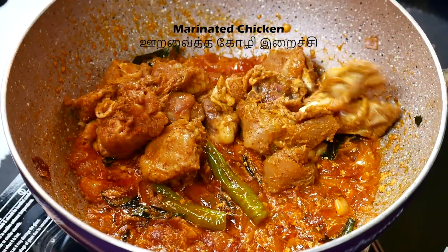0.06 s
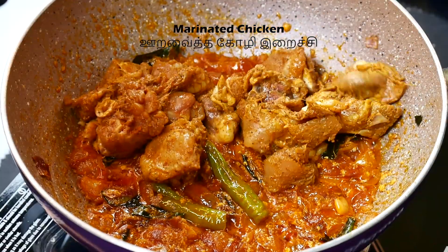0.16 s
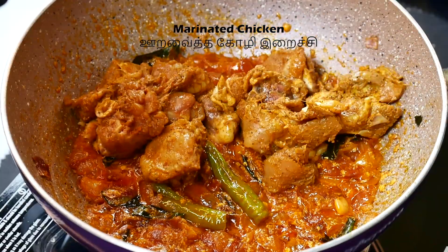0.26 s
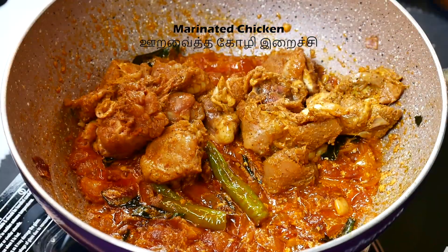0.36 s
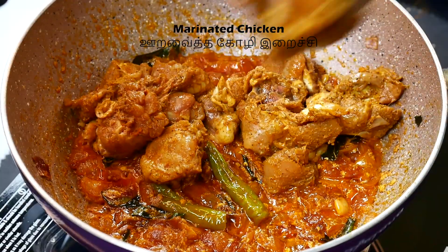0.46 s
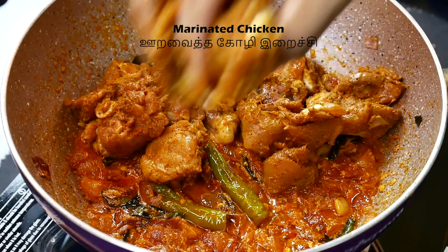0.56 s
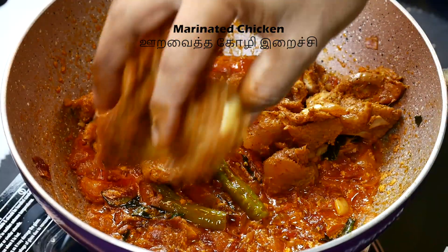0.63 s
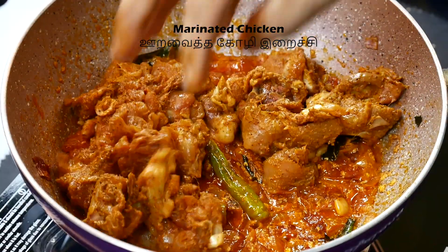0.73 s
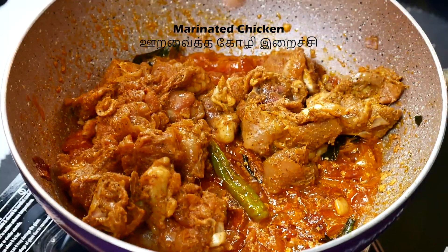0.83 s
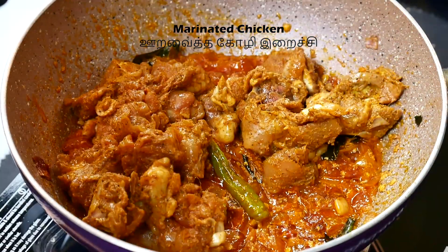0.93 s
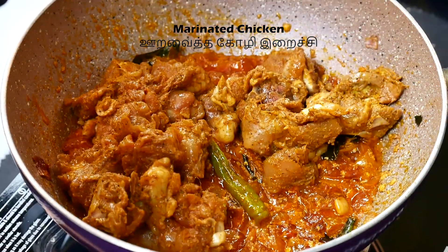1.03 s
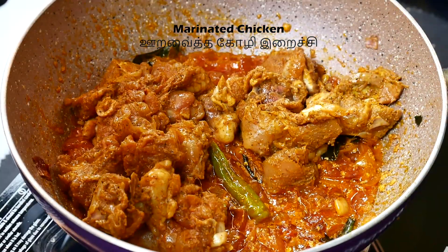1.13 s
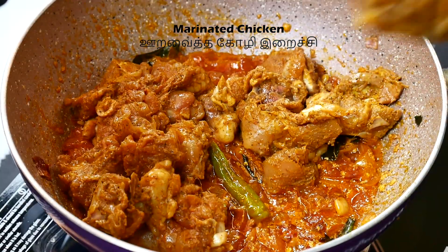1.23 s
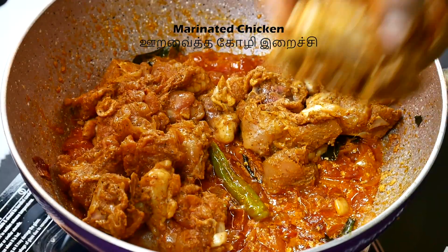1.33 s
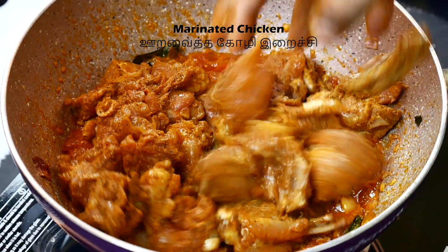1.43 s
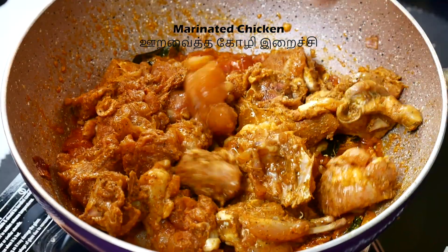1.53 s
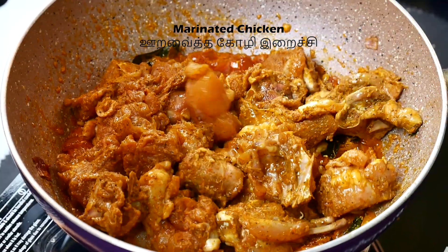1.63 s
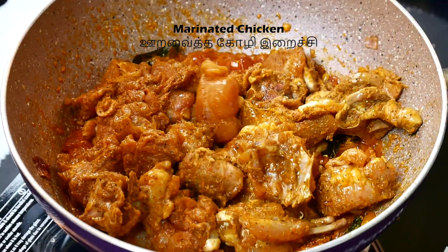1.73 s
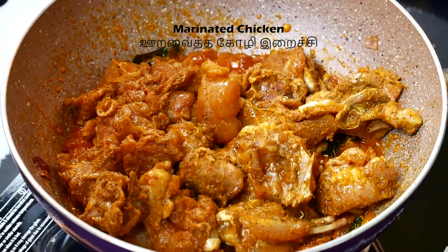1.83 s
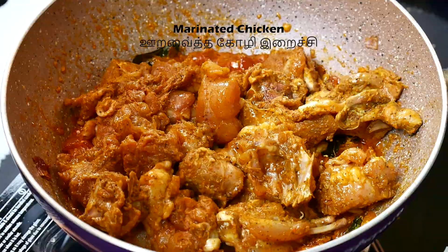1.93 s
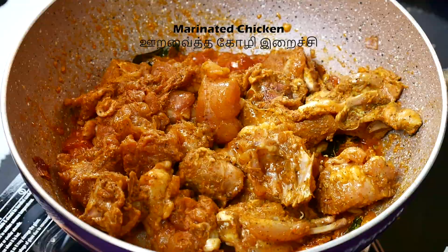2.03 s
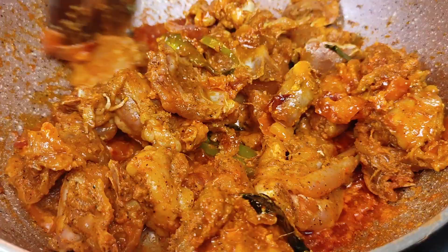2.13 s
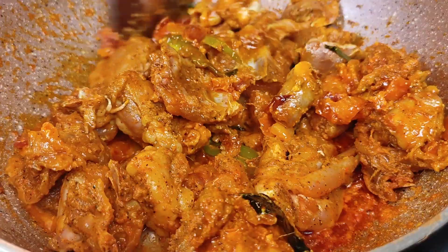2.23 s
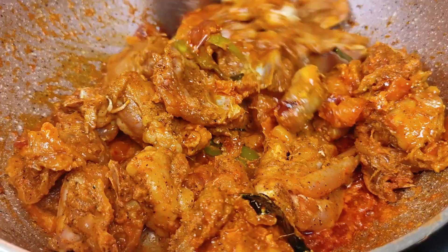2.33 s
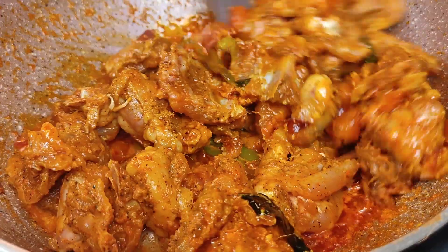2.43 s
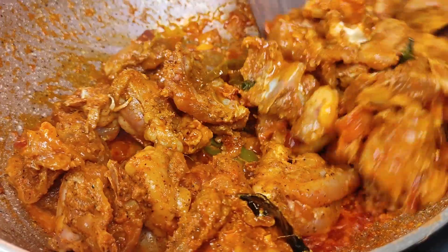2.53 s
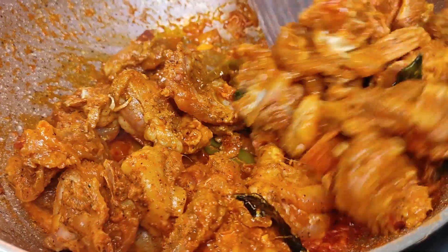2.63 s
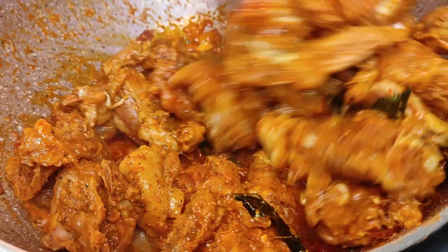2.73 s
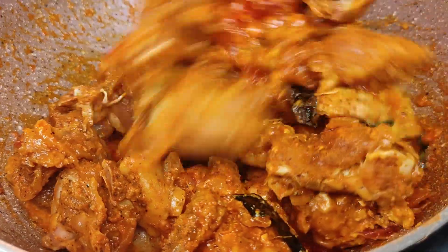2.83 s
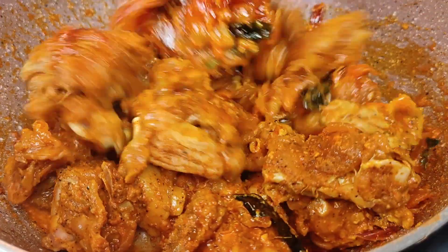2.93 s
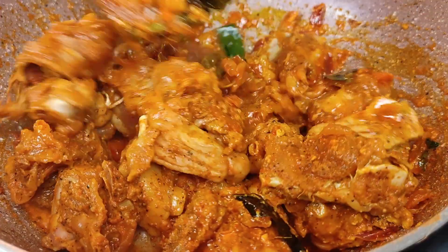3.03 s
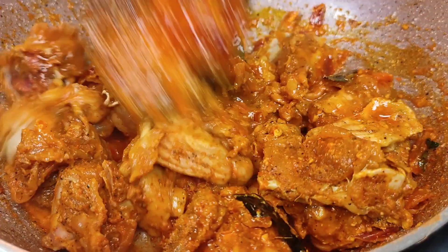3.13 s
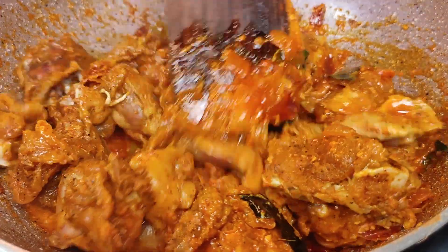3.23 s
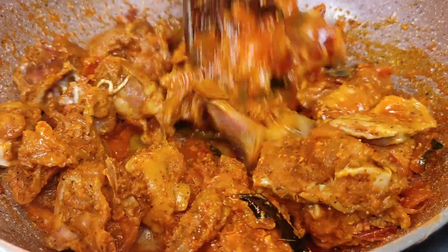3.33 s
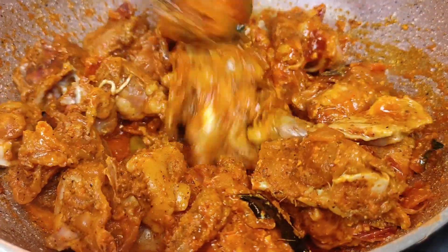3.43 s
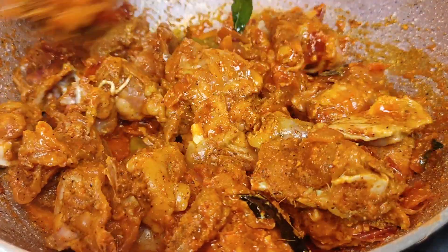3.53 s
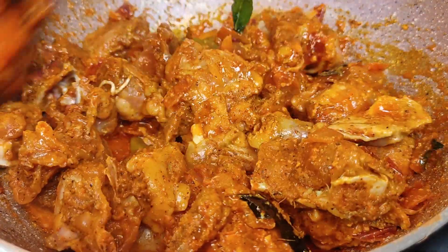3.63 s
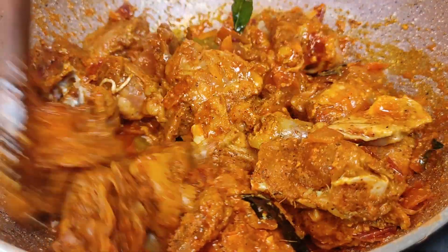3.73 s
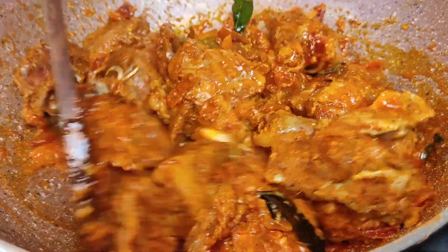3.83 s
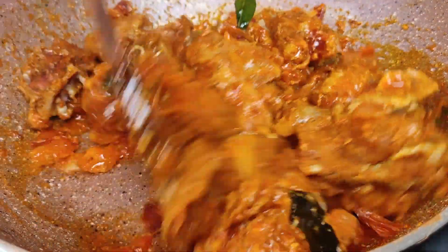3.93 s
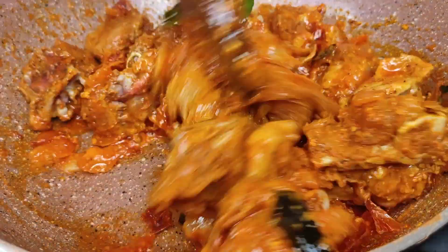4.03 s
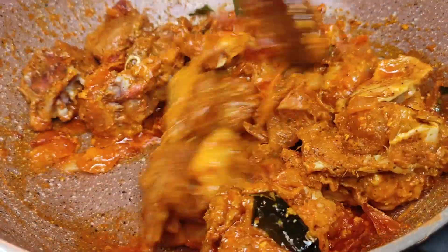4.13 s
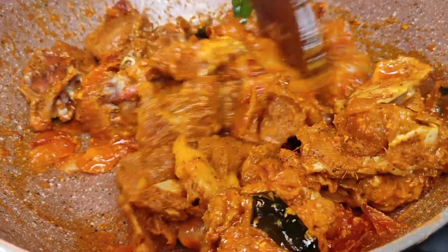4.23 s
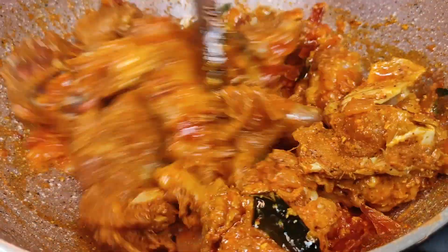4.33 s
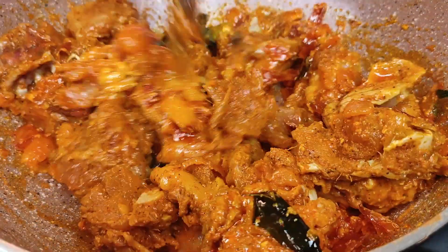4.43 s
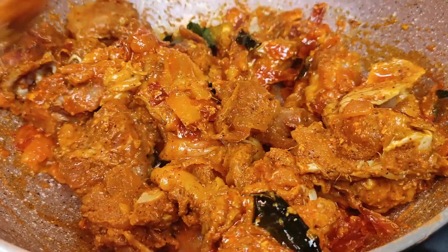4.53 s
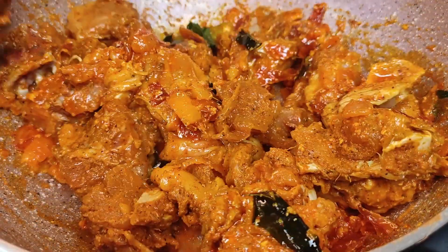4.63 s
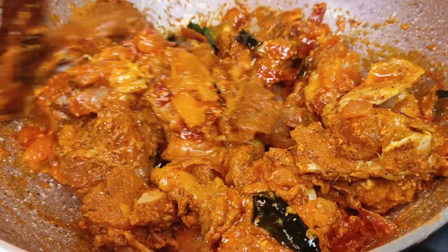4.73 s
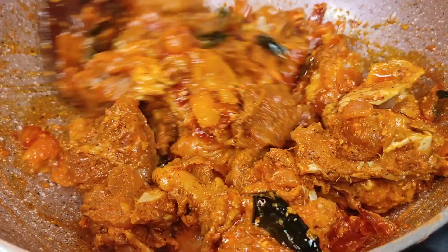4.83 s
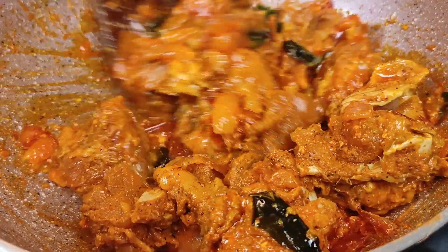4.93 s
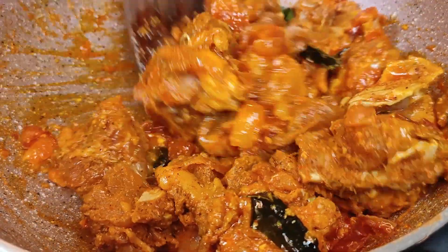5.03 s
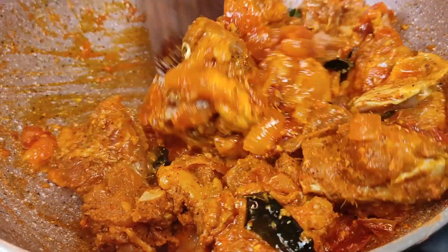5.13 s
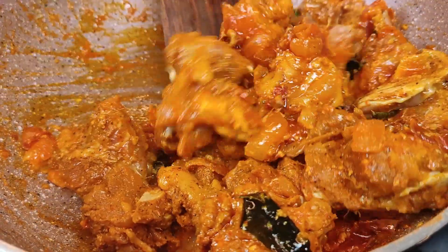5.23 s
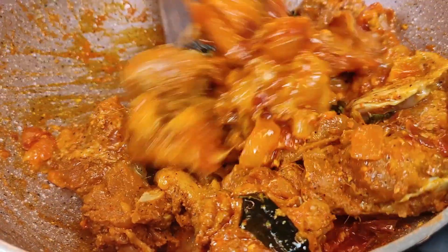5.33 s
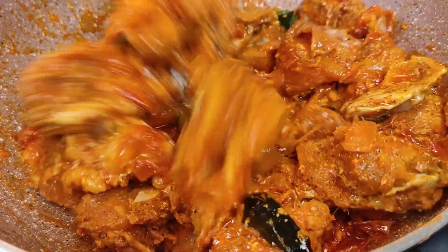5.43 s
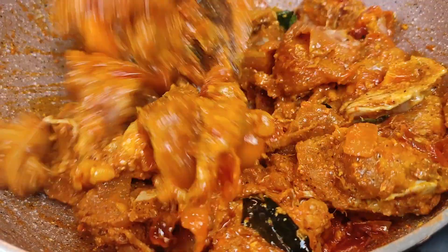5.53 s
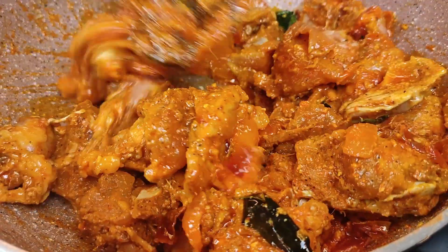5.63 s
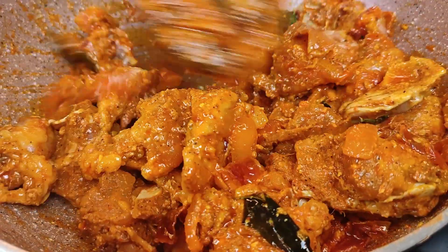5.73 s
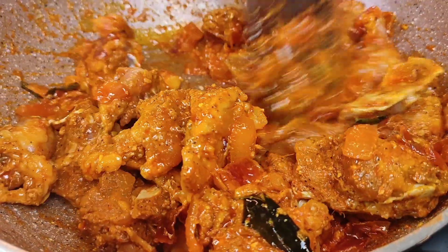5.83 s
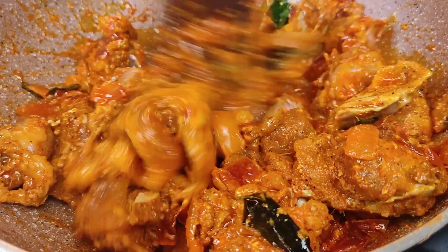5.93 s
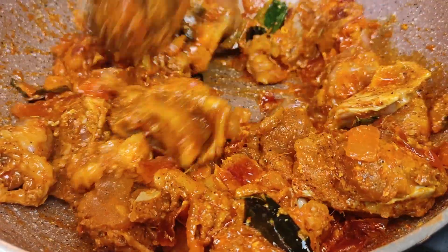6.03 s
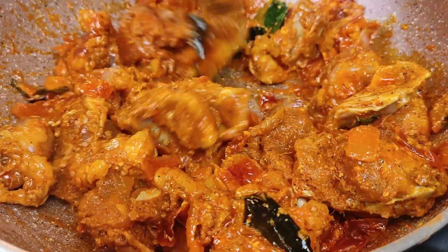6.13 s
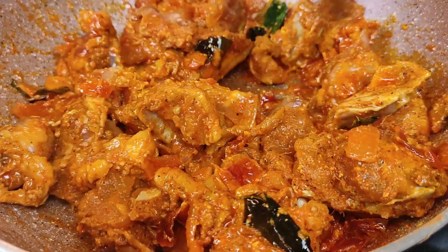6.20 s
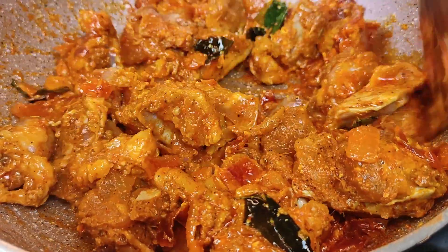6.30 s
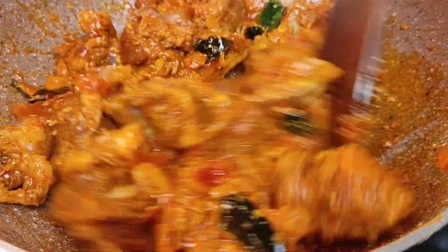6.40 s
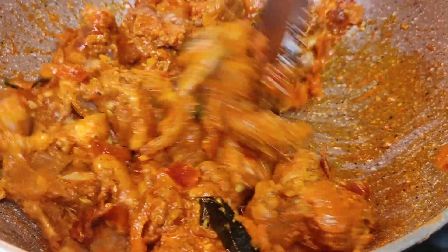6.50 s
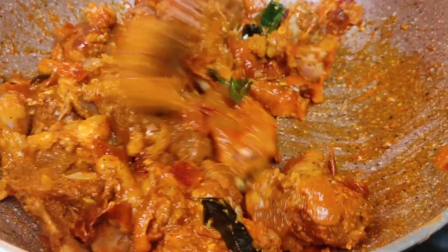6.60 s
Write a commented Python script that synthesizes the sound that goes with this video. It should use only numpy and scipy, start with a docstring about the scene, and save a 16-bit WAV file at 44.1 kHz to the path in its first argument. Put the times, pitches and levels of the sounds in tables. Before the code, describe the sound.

A close, dry-sounding kitchen with faint low room murmur and an even, bubbling simmer in a heavy pan throughout. Almost at once, around 0.05 s, a wet piece of meat slaps down with a strong dull knock and a fading crackle of juice. A sharp spit pops at 0.2 s. More pieces land at 0.75 s with a crisp wet smack and at 1.5 s with a squelch and deep soft thud. The simmer continues alone until a hollow double knock at 2.2 s. From 2.4 s a wooden spatula scrapes the gritty coating in repeated strokes, with taps and bumps near 3.05, 3.5, 4.05 and 5.1 to 5.25 s. The sizzle swells, bright and crackling, with a loud spit at 2.8 s and hissing bursts around 4.4 to 4.7 s. A heavy thump comes at 6.04 s, lighter knocks at 6.2 s, and vigorous frying runs to the end.

```python
"""Sauce simmers in a pan over low room noise; within the first second and a half three pieces of
marinated meat drop in with wet slaps and dull knocks, and fry off their juice. From about 2.4 s a wooden
spatula turns them: it bumps and scrapes the coated pan, and the sizzle swells as wet meat meets hot metal.
Frying is random clicks and ringing bubbles, knocks are decaying modes of pan and hob, slaps are bursts
of wet films; a dense tail adds the small kitchen around one close microphone."""
import sys
import numpy as np
from scipy import signal
from scipy.fft import rfft, irfft
from scipy.io import wavfile

SR = 44100
rng = np.random.default_rng(int(sys.argv[2]) if len(sys.argv) > 2 else 0)


def waveform_to_disk(signal):
    """Save audio, clipped to [-1, 1], as 16-bit WAV at the path in sys.argv[1]."""
    frames = np.transpose(np.atleast_2d(signal))
    scaled = np.clip(frames, -1, 1) * 32767
    samples = np.round(scaled).astype(np.int16)
    wavfile.write(sys.argv[1], SR, samples)


N = 293706
TIME = np.arange(N) / SR  # s


def from_db(db):
    """Decibels to gain."""
    return 10 ** (np.asarray(db) / 20)


def rms_one(x):
    """Scale to rms 1."""
    return x / np.sqrt(np.mean(x ** 2) + 1e-20)


def level(rows):
    """A curve of (s, dB) points as a gain, faded in just before its first point."""
    s, db = np.transpose(rows)
    fade_in = np.clip(1 + (TIME - s[0]) / 0.15, 0, 1)
    return from_db(np.interp(TIME, s, db)) * fade_in


def fading(events, rise_s, fade_s):
    """Each (s, dB) event rises quickly and dies away; their powers add."""
    power = 0
    for s, db in events:
        age = np.maximum(TIME - s, 0)
        shape = (1 - np.exp(-age / rise_s)) * np.exp(-age / fade_s)
        power = power + (from_db(db) * shape) ** 2
    return np.sqrt(power)


def swell(at, db, half_s):
    """A bell-shaped rise and fall in level."""
    return from_db(db) * np.exp(-((TIME - at) / half_s) ** 2)


def drift(rate):
    """Slow chance with spread 1, drawn at every 40th sample."""
    r = np.exp(-80 * np.pi * rate / SR)
    noise = rng.standard_normal(N // 40 + 2002)
    slow = signal.lfilter([1], [1, -2 * r, r * r], noise)[2000:]  # the filter has settled by then
    return np.interp(np.arange(N) / 40, np.arange(len(slow)), rms_one(slow))


def coloured(x, spectrum, size=4096):
    """Causal (minimum-phase) filter of unit energy with the given spectrum."""
    hz, db = np.transpose(spectrum)
    grid = np.maximum(np.fft.rfftfreq(size, 1 / SR), 1)
    skirts = np.minimum(grid / hz[0], 1) ** 2 * np.minimum(hz[-1] / grid, 1) ** 2
    magnitude = skirts * from_db(np.interp(np.log(grid), np.log(hz), db))
    cepstrum = irfft(np.log(magnitude))
    # keeping only the causal half of the cepstrum gives minimum phase
    response = irfft(np.exp(rfft(2 * cepstrum[:size // 2], size)))
    return signal.oaconvolve(x, response / np.linalg.norm(response))[:N]


def ring(clicks, hz, t60):
    """A unit click sets a decaying sine of height 1 ringing; it drops 60 dB in t60 seconds."""
    r, w = from_db(-60 / (t60 * SR)), 2 * np.pi * hz / SR
    return signal.lfilter([0, np.sin(w)], [1, -2 * r * np.cos(w), r * r], clicks + 1e-18)


def clicks_at(times, heights):
    """One click of the given height at each time."""
    out = np.zeros(N)
    out[np.clip(np.round(times * SR).astype(int), 0, N - 1)] = heights
    return out


def grains(per_s, spread_db, clump_db):
    """Random clicks in clumps; a positive spread makes most small and a few large, zero makes all equal."""
    born = rng.random(N) < per_s * from_db(clump_db * drift(25)) / SR
    sizes = from_db(spread_db * np.minimum(rng.exponential(1, N), 5))
    return born * sizes * rng.choice([-1, 1], N)


def bubbles(clicks, low_hz, high_hz, cycles, count=20):
    """Each click rings a bubble at one of `count` pitches, dying in a set number of cycles."""
    dealt = rng.integers(0, count, N)
    pitches = np.geomspace(low_hz, high_hz, count)
    # the factor hz makes high bubbles stronger
    voices = [ring(clicks * (dealt == k), hz, cycles / hz) * hz for k, hz in enumerate(pitches)]
    return rms_one(sum(voices))


def pops(rows, rise_s, fade_s, glide):
    """Each (s, dB, Hz) pocket of gas rings briefly as it opens, its pitch rising by the share `glide`."""
    out, t = np.zeros(N + SR), TIME[:SR // 10]
    envelope = (1 - np.exp(-t / rise_s)) * np.exp(-t / fade_s)
    envelope = envelope / envelope.max()
    cycles = np.cumsum(1 + glide * (0.5 - np.exp(-t / (2 * fade_s)))) / SR
    for s, db, hz in rows:
        start = int(s * SR)
        out[start:start + len(t)] += from_db(db) * envelope * np.sin(2 * np.pi * hz * cycles)
    return out[:N]


def resonate(x, centre_hz, width_hz, size=128):
    """A resonance whose centre may move over time, updated block by block; rms 1."""
    r, state, out = np.exp(-np.pi * width_hz / SR), np.zeros(2), np.zeros(N)
    w = 2 * np.pi * np.broadcast_to(centre_hz, N) / SR
    for i in range(0, N, size):
        poles = [1, -2 * r * np.cos(w[i]), r * r]
        out[i:i + size], state = signal.lfilter([1, 0, -1], poles, x[i:i + size], zi=state)
    return rms_one(out)


def struck(times, db, modes, vary_db, travel_s=0.00099):
    """Every blow lands somewhere else and so sets each mode's size, sign and arrival anew."""
    size, side, path = np.moveaxis(rng.standard_normal((len(times), len(modes), 3)), -1, 0)
    weights = np.sign(side) * from_db(db[:, None] + vary_db * size)
    arrivals = times[:, None] + travel_s * np.abs(path)
    out = 0
    for k, (hz, mode_db, t60) in enumerate(modes):
        out = out + ring(clicks_at(arrivals[:, k], weights[:, k] * from_db(mode_db)), hz, t60)
    return out


def kitchen(x, wet_db, t60):
    """Direct sound plus dense reflections from hob, walls and cupboards."""
    t = TIME[:SR // 2]
    tail = rng.standard_normal(len(t)) * from_db(-60 * t / t60) * (t > .003)
    return x + from_db(wet_db) * signal.oaconvolve(x, tail / np.linalg.norm(tail))[:N]


# Resonances of the pan's bowl. Each row: frequency in Hz, width in Hz, level against the direct sound in dB.
BOWL = [(567.6, 11, 5), (632, 7.2, -1), (729.6, 9.7, 12.5), (793, 16, 8.5), (965, 18, 1), (1300, 62, -4),
        (3290, 39, -13), (3330, 51, -23), (3540, 85, -10)]


def bowl(x):
    """Whatever sounds inside the pan is lifted at the resonances of its bowl."""
    out = x
    for hz, width, db in BOWL:
        r = np.exp(-np.pi * width / SR)
        poles = [1, -2 * r * np.cos(2 * np.pi * hz / SR), r * r]
        out = out + from_db(db) * (1 - r * r) / 2 * signal.lfilter([1, 0, -1], poles, x + 1e-18)
    return out


# Spectrum of the room's murmur. Each row: frequency in Hz, density in dB per Hz.
ROOM_COLOUR = [(20, 2), (45, -15), (75, -5), (105, 4), (135, -11.5), (250, -7.5), (600, -3), (3000, -29)]


def room():
    """The low murmur of the room: steady coloured noise."""
    return from_db(-53.5) * coloured(rng.standard_normal(N), ROOM_COLOUR)


def frying(colour, per_s, spread_db, bubble_db):
    """Sharp crackle and tiny ringing bubbles of one spectrum; rms 1."""
    crackle = rms_one(grains(per_s, spread_db, clump_db=2.5))
    fizz = bubbles(grains(per_s / 2, spread_db, clump_db=2.5), low_hz=784, high_hz=7330, cycles=14.4)
    return rms_one(coloured(crackle + from_db(bubble_db) * fizz, colour))


SIMMER_DB = -41.5  # steady, before bowl and kitchen
# Spectrum of the simmer. Each row: frequency in Hz, density in dB per Hz.
SIMMER_COLOUR = [(300, -28.5), (480, -18), (590, -2.5), (760, -10.5), (1050, 1), (1350, -4.5), (1600, -7),
                 (2080, -1.5), (2400, -8), (3100, 0.5), (4300, -9.5), (6500, -16.5), (9000, -22.5),
                 (15000, -38)]


def simmer():
    """The sauce boils evenly throughout."""
    return from_db(SIMMER_DB) * frying(SIMMER_COLOUR, per_s=7000, spread_db=2.0, bubble_db=-6.5)


# Spectrum of the frying juice. Each row: frequency in Hz, density in dB per Hz.
JUICE_COLOUR = [(900, -11), (2000, -5.5), (3600, 1.5), (5000, -4.5), (8000, -11.5), (15000, -20.5)]


def juice():
    """Each dropped piece fries off its juice in a fading crackle."""
    drops = [(at, juice_db) for at, _, _, juice_db in DROPS]
    crackle = frying(JUICE_COLOUR, per_s=3700, spread_db=2.0, bubble_db=-25)
    return fading(drops, rise_s=0.0045, fade_s=0.46) * crackle


# Wet meat turned onto hot metal. Each row: time in seconds, relative sear level in dB, oil spray level in dB.
SEARING = [(2.35, -40, -66), (2.48, -39, -55), (2.55, -34.5, -50.5), (2.8, -35.5, -45.5),
           (3.03, -33.5, -43), (3.38, -31.5, -47), (3.65, -31, -44.5), (3.9, -30.5, -41), (4.25, -33, -40),
           (4.62, -29, -39.5), (4.9, -31, -44), (5.35, -29, -43.5), (5.55, -31.5, -43), (6.35, -30, -46.5),
           (6.6, -30.5, -42.5)]
# Spectrum of the sear. Each row: frequency in Hz, density in dB per Hz.
SEAR_COLOUR = [(500, -31), (900, -5.5), (1600, -7), (2200, -4.5), (2700, -2), (3200, -3), (4200, -3),
               (5200, -6.5), (6800, -16), (9000, -19.5), (15000, -25)]


def sear_level():
    """The rise and fall of the searing as a gain."""
    return level([(at, sear_db) for at, sear_db, _ in SEARING])


def sear():
    """Wet meat on hot metal boils in a dense, bright crackle."""
    crackle = frying(SEAR_COLOUR, per_s=11000, spread_db=2.5, bubble_db=-4.0)
    return from_db(-1.48) * sear_level() * crackle


# Spectrum of the fine oil spray. Each row: frequency in Hz, density in dB per Hz.
SPRAY_COLOUR = [(3500, -6), (6500, 3.5), (8500, -1), (11000, -3.5), (14000, -8), (16000, -10)]


def spray(idle_db=-55.5):
    """A treble mist of nearly equal droplets: steady at rest, stronger with the searing."""
    mist = coloured(grains(per_s=14000, spread_db=0.5, clump_db=2.5), SPRAY_COLOUR)
    stirred = level([(at, spray_db) for at, _, spray_db in SEARING])
    return np.hypot(from_db(idle_db), stirred) * rms_one(mist)


# Sauce runs onto bare hot metal. Each row: time of the peak in seconds, level in dB, half length in seconds.
FLARES = [(2.86, -41.5, 0.15), (3.743, -40, 0.1), (4.428, -38, 0.044), (4.667, -32.5, 0.055),
          (5.287, -42, 0.14)]
# Spectrum of a flare. Each row: frequency in Hz, density in dB per Hz.
FLARE_COLOUR = [(1500, -6), (3000, -5), (4800, 9), (6500, 7), (8000, 2), (11000, -29)]


def flares():
    """Sauce on bare metal flares up in a swelling hiss of very uneven grains."""
    hiss = rms_one(coloured(grains(per_s=11000, spread_db=6.0, clump_db=1.5), FLARE_COLOUR))
    return sum(swell(at, db, half_s) for at, db, half_s in FLARES) * hiss


# Strokes of the spatula. Each row: start in seconds, length in seconds, then the relative levels in dB of
# the scrape, the sputter of wet sauce and the tumbling meat.
STROKES = [(2.438, 0.36, -38, -50, -66), (3.033, 0.41, -39, -39.5, -58), (3.53, 0.27, -38, -44, -36.5),
           (3.933, 0.52, -37, -36.5, -50), (4.577, 0.19, -39.5, -32.5, -52), (4.83, 0.7, -39.5, -36, -56),
           (5.58, 0.21, -38.5, -33, -62), (6.075, 0.2, -38.5, -33, -38.5), (6.332, 0.34, -43, -36.5, -68)]


def stroke_levels(attack_s=0.069, release_s=0.21):
    """Every stroke builds up, holds and lets go: gains of scrape, sputter and tumble."""
    power = 0
    for start, length, *db in STROKES:
        attack = np.clip((TIME - start) / attack_s, 0, 1)
        release = np.exp(-np.maximum(TIME - start - length, 0) / release_s)
        power = power + np.outer(from_db(db), attack * release) ** 2
    return np.sqrt(power)


# Spectrum of the sputter. Each row: frequency in Hz, density in dB per Hz.
SPUTTER_COLOUR = [(900, -18), (1500, -7), (1900, -1), (2250, -1.5), (2600, -0.5), (3200, -10), (5000, -22)]


def sputter():
    """Wet sauce sputters with every stroke."""
    _, sputter_level, _ = stroke_levels()
    return sputter_level * frying(SPUTTER_COLOUR, per_s=5000, spread_db=3.0, bubble_db=-4.0)


def sizzle():
    """All the frying together, sounding through the bowl into the kitchen."""
    in_pan = simmer() + juice() + sear() + sputter() + flares() + spray()
    return kitchen(bowl(in_pan), wet_db=-11.5, t60=0.17)


# A shifting hollow between the pieces. Each row: time in seconds, centre in Hz, relative level in dB.
HOLLOW = [(2.5, 3250, -52), (2.75, 3000, -45.5), (3.2, 3130, -41), (3.45, 3280, -38), (3.65, 3250, -36),
          (3.87, 3080, -37), (4.14, 3130, -35), (4.27, 3240, -42), (4.5, 3300, -35), (5.2, 3100, -37.5),
          (5.55, 3300, -40.5), (6.05, 3230, -36), (6.4, 3160, -34), (6.6, 3100, -49)]


def hollow(width_hz=560):
    """Crackle rings in a hollow between the pieces, whose pitch shifts as they are turned."""
    s, hz, db = np.transpose(HOLLOW)
    centre = np.interp(TIME, s, hz)
    crackle = grains(per_s=3000, spread_db=4.0, clump_db=2.0)
    voice = resonate(resonate(crackle, centre, width_hz), centre, 2 * width_hz)
    return from_db(1.5) * level(np.c_[s, db]) * voice


# Squeezed pockets of wet sauce boiling off. Each row: time of the peak in seconds, level in dB, half length
# in seconds, pitch in Hz.
SURGES = [(1.85, -48, 0.5, 2470), (2.338, -41, 0.018, 2400), (3.26, -42, 0.068, 2070),
          (3.462, -32.5, 0.034, 2700), (4.453, -35, 0.042, 2460), (4.654, -33, 0.062, 2250),
          (5.14, -35.5, 0.16, 2340), (5.324, -31.5, 0.034, 1570)]


def surges(width_hz=580):
    """Squeezed pockets of sauce boil off in short surges, each with a pitch of its own."""
    boiling = grains(per_s=2300, spread_db=1.5, clump_db=2.5)
    out = 0
    for at, db, half_s, hz in SURGES:
        voice = resonate(resonate(boiling, hz, width_hz, size=N), hz, 2 * width_hz, size=N)
        out = out + swell(at, db, half_s) * voice
    return out


def pockets():
    """Crackle trapped between the pieces: the hollow and the surges in the kitchen."""
    return kitchen(hollow() + surges(), wet_db=-7.5, t60=0.12)


# The loudest drops spitting in the oil. Each row: time in seconds, bubble peak in dB, bubble pitch in Hz.
SPITS = [(0.2303, -22, 3900), (0.4346, -32, 3900), (0.6385, -28, 3380), (2.0725, -35.5, 2710),
         (2.1928, -31, 3200), (2.7773, -20.5, 3200), (3.0267, -25, 2410), (4.526, -26.5, 3160),
         (6.0685, -24, 3300)]
# Spectrum of a spit's snap. Each row: frequency in Hz, density in dB per Hz.
SPIT_COLOUR = [(500, 5), (1500, 0), (3300, 4), (4500, 15.5), (8000, -7), (15000, -18)]


def spits(snap_db=12, small_db=-10.5):
    """A drop of water bursts in the oil: a snap and a ringing bubble. Small ones grow with the frying."""
    s, db, _ = np.transpose(SPITS)
    vigour = np.hypot(from_db(SIMMER_DB), sear_level())
    small_clicks = grains(per_s=70, spread_db=2.5, clump_db=2.0)
    small = vigour * bubbles(small_clicks, low_hz=1610, high_hz=3900, cycles=43)
    loud = pops(SPITS, rise_s=0.00025, fade_s=0.0019, glide=0.12)
    snaps = bowl(coloured(clicks_at(s, from_db(db + snap_db)), SPIT_COLOUR))
    return loud + from_db(small_db) * small + kitchen(snaps, wet_db=3.0, t60=0.56)


# Spectrum of the scrape. Each row: frequency in Hz, density in dB per Hz.
SCRAPE_COLOUR = [(350, -12), (520, -9), (620, -3.5), (720, -6.5), (920, 3.5), (1200, 3), (1550, -9),
                 (2500, -8.5)]


def scrape():
    """Wood slips over the gritty coating in tiny jerks of equal size."""
    scrape_level, _, _ = stroke_levels()
    slips = coloured(grains(per_s=1500, spread_db=0.0, clump_db=4.5), SCRAPE_COLOUR)
    return from_db(-1.5) * scrape_level * rms_one(bowl(slips))


# Spectrum of the rolling meat. Each row: frequency in Hz, density in dB per Hz.
TUMBLE_COLOUR = [(50, 1), (100, -22), (160, -0.5), (220, 5), (320, -2), (480, -2), (900, -4.5)]


def tumble(heave_db=-52, settle_db=-24):
    """The sauce heaves slowly; soft pieces roll with each stroke and settle after each blow."""
    _, _, tumble_level = stroke_levels()
    shaken = [(s, thump_db + settle_db) for s, _, _, _, thump_db, *_ in KNOCKS]
    settling = fading(shaken, rise_s=0.025, fade_s=0.18)
    rolls = coloured(grains(per_s=360, spread_db=3.0, clump_db=4.0), TUMBLE_COLOUR)
    gain = np.sqrt(from_db(heave_db) ** 2 + tumble_level ** 2 + settling ** 2)
    return from_db(-3.5) * gain * rms_one(rolls)


def stirring():
    """Scraping wood and tumbling meat in the kitchen."""
    return kitchen(scrape() + tumble(), wet_db=-6, t60=0.063)


# Heavy pieces slump onto the pile. Each row: time in seconds, relative level in dB.
SLUMPS = [(0.245, -29), (1.496, -33), (1.532, -16.5), (1.73, -26.5), (4.07, -18), (4.6, -35)]


def slumps(body_hz=135, body_t60=0.022, soft_hz=230):
    """Soft meat lands without a clack: only a deep, damped thud."""
    s, db = np.transpose(SLUMPS)
    body = ring(clicks_at(s, from_db(db)), body_hz, body_t60)
    soft = signal.sosfilt(signal.butter(2, soft_hz, fs=SR, output="sos"), body)
    return kitchen(soft, wet_db=-6.0, t60=0.32)


# The spatula's edge meets the pan. Each row: time in seconds, relative level in dB.
TAPS = [(2.4245, -21), (3.0535, -21), (3.4807, -17), (4.06, -18)]
# Modes of the wooden blade. Each row: frequency in Hz, level in dB, t60 in seconds.
SPATULA_MODES = [(1972, -1.5, 0.016), (3000, -7, 0.013)]
# Air escapes from under a landing piece. Each row: time in seconds, peak in dB, pitch in Hz.
SMACKS = [(0.7395, -15.5, 3390), (0.7468, -18, 1960), (0.7505, -19.5, 1310), (1.4702, -29, 1310),
          (1.4832, -17, 3350), (1.499, -23.5, 2720)]


def contacts():
    """The spatula's edge ticks on bare pan; air trapped under a landing piece breaks out in wet smacks."""
    ticks = struck(*np.transpose(TAPS), SPATULA_MODES, vary_db=-1.0)
    smacks = pops(SMACKS, rise_s=0.00081, fade_s=0.0021, glide=0.07)
    return kitchen(ticks + smacks, wet_db=-7.5, t60=0.3)


# Pieces dropped into the sauce. Each row: time in seconds, relative slap level in dB, delay in seconds until
# the rest of the piece flops down, level in dB of the juice frying off.
DROPS = [(0.037, -23, 0.01, -38.5), (0.7348, -18, 0.015, -45), (1.469, -21, 0.015, -46.5)]
# Spectrum of a slap. Each row: frequency in Hz, density in dB per Hz.
SLAP_COLOUR = [(100, 3), (400, -9), (900, -6), (1300, -3), (1600, -8.5), (1950, -4.5), (2600, -5),
               (3400, -2), (4500, -7), (8000, -18), (15000, -30)]


def slaps(flop_db=-5):
    """Wet meat, dropped or hit by the spatula, squeezes out a short burst of bursting films."""
    touches = [(s, db) for s, db, _, _ in DROPS]
    flops = [(s + after, db + flop_db) for s, db, after, _ in DROPS]
    squelches = [(s, squelch_db) for s, *_, squelch_db in KNOCKS]
    envelope = fading(touches + flops, rise_s=0.0038, fade_s=0.006)
    envelope = envelope + fading(squelches, rise_s=0.00054, fade_s=0.0095)
    film_clicks = grains(per_s=2100, spread_db=-1.0, clump_db=1.0)
    films = bubbles(film_clicks, low_hz=1280, high_hz=3840, cycles=15, count=9)
    spatter = rms_one(grains(per_s=7700, spread_db=3.0, clump_db=0.0))
    burst = envelope * (spatter + from_db(-10.5) * films)
    return from_db(2) * kitchen(bowl(coloured(burst, SLAP_COLOUR)), wet_db=-3.5, t60=0.33)


# Dull, close-packed vibration of pan and food. Each row: frequency in Hz, density in dB per Hz.
THUD_COLOUR = [(120, -3), (210, -1.5), (310, -1), (480, -5.5), (700, -14), (950, -0.5), (1150, -14),
               (1600, -15.5)]


def thuds(against_thump_db=-6.5):
    """The food damps the pan: a blow also dies at once in a pitchless thud of noise."""
    blows = [(s, thump_db + against_thump_db) for s, _, _, _, thump_db, *_ in KNOCKS]
    envelope = fading(blows, rise_s=0.0007, fade_s=0.014)
    return kitchen(coloured(envelope * rng.standard_normal(N), THUD_COLOUR), wet_db=-6.5, t60=0.29)


def clunks(against_thump_db=3.5, clunk_t60=0.047, floor_hz=239, floor_t60=0.27, floor_delay_s=0.00815):
    """Each blow has a short hollow clunk, pitched by what lands and where; then the pan's floor rings on."""
    s, _, _, rock_s, thump_db, clunk_hz, floor_db, _, _ = np.transpose(KNOCKS)
    hits = s + rock_s
    clunk = 0
    for at, db, hz in zip(hits, thump_db + against_thump_db, clunk_hz):
        clunk = clunk + ring(clicks_at(at, from_db(db)), hz, clunk_t60)
    floor = ring(clicks_at(hits + floor_delay_s, from_db(floor_db)), floor_hz, floor_t60)
    soft_band = signal.butter(2, [90, 560], "band", fs=SR, output="sos")
    return kitchen(signal.sosfilt(soft_band, clunk + floor), wet_db=-7.5, t60=0.15)


# Blows on the pan by meat or spatula. Each row: time in seconds, wall clack in dB, clack pitch in Hz, delay in
# seconds until the pan meets the hob, thump in dB, clunk pitch in Hz, ring of the pan's floor in dB, rim note
# in dB, wet squelch in dB. All levels are relative.
KNOCKS = [(0.0547, -9.5, 1020, 0.0072, -17.5, 288, -26, -36, -28),
          (0.099, -27, 1090, 0.0027, -32, 215, -37, -55, -47),
          (0.748, -35, 800, 0.004, -39.5, 190, -43, -43, -44),
          (1.478, -26, 1150, 0.008, -33, 150, -42, -47, -30),
          (2.2207, -18, 1150, 0.0035, -39, 200, -50, -47, -39),
          (2.226, -13, 1016, 0.0031, -18.5, 192, -31, -33.5, -45),
          (2.4241, -19.5, 1160, 0.009, -30, 117, -41, -42, -35),
          (3.054, -31, 684, 0.0097, -29, 105, -52, -29.5, -27.5),
          (3.4805, -20, 1050, 0.0043, -27, 392, -42, -29, -32),
          (3.4895, -13.5, 1055, 0.0022, -22, 192, -35, -29, -44),
          (3.885, -29, 950, 0.0041, -36, 250, -42, -41, -31),
          (4.061, -20, 880, 0.0021, -20, 350, -42, -36.5, -34),
          (5.083, -28, 850, 0.004, -27.5, 316, -30.5, -41, -31),
          (5.254, -25, 910, 0.0041, -31.5, 164, -54, -40, -37),
          (6.0407, -15.5, 890, 0.0081, -17.5, 208, -22.5, -29.5, -31),
          (6.226, -23.5, 814, 0.004, -34, 165, -46, -54, -45),
          (6.245, -21.5, 1000, 0.0048, -29.5, 138, -47, -38, -35)]
# Modes of the loaded pan's wall. Each row: frequency in Hz, level in dB, t60 in seconds.
PAN_MODES = [(572, -11, 0.083), (695, 2, 0.029), (738, -2.5, 0.075), (917, -8.5, 0.09), (1000, -8, 0.05),
             (1075, -6.5, 0.043), (1367, -11, 0.056)]
# Modes of the pan rocking on the hob. Each row: frequency in Hz, level in dB, t60 in seconds.
HOB_MODES = [(52, -24, 0.47), (83.4, -15.5, 0.31), (106, -1.5, 0.087), (147, -21, 0.071), (200, -7, 0.17),
             (281, -10.5, 0.09), (356, -4.5, 0.053), (428, -12.5, 0.087)]


def knocks(rebound_s=0.00806, rebound_db=-7.5, spot_t60=0.026, rim_hz=615, rim_t60=0.43):
    """The wall clacks and the free rim sings on; then the pan thumps on the hob. Wall and hob rebound once."""
    s, clack_db, _, rock_s, thump_db, _, _, rim_db, _ = np.transpose(KNOCKS)
    touches = np.r_[s, s + rebound_s]
    clacks = np.r_[clack_db, clack_db + rebound_db]
    thumps = np.r_[thump_db, thump_db + rebound_db]
    wall = from_db(-9.0) * struck(touches, clacks, PAN_MODES, vary_db=3.5)
    # the struck spot of the wall has a short note of its own
    spot = sum(ring(clicks_at(at, from_db(db)), hz, spot_t60) for at, db, hz, *_ in KNOCKS)
    # soft contacts carry no treble, and the thin wall radiates no bass
    wall_band = signal.butter(2, [330, 1700], "band", fs=SR, output="sos")
    clack = signal.sosfilt(wall_band, wall + spot)
    rim = ring(clicks_at(s, from_db(rim_db)), rim_hz, rim_t60)
    thump = from_db(-2.0) * struck(touches + np.r_[rock_s, rock_s], thumps, HOB_MODES, vary_db=-1.0)
    return rim + kitchen(clack + thump, wet_db=-8, t60=0.28)


def scene():
    """Everything at the pan over the low murmur of the room, alike in both channels."""
    frying_sauce = sizzle() + pockets() + spits()
    moving_meat = stirring() + slumps() + contacts() + slaps()
    blows = thuds() + clunks() + knocks()
    mono = room() + frying_sauce + moving_meat + blows
    return np.stack([mono, mono])


def record(dry):
    """The microphone loses the deepest bass; the top is cut steeply."""
    thin = signal.sosfilt(signal.butter(3, 42, "high", fs=SR, output="sos"), dry)
    return signal.sosfilt(signal.ellip(12, .1, 80, 15650, fs=SR, output="sos"), thin)


dry = scene()
out = record(dry)
waveform_to_disk(out)
```